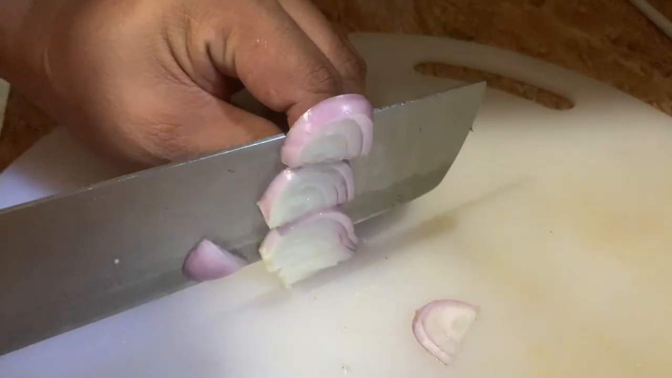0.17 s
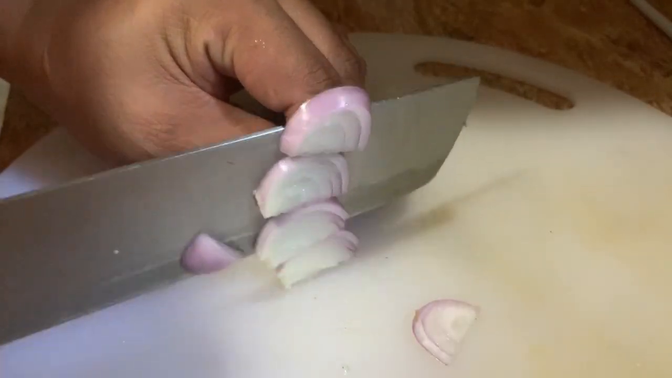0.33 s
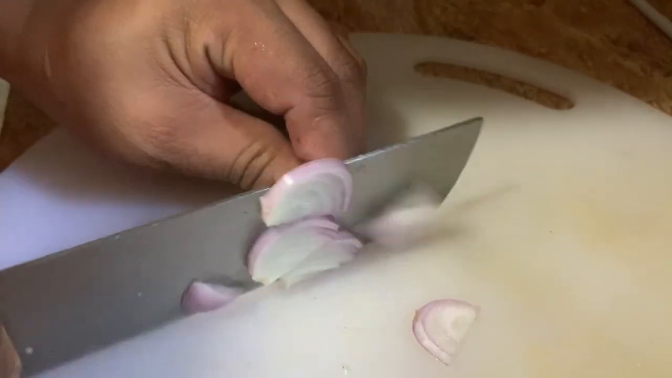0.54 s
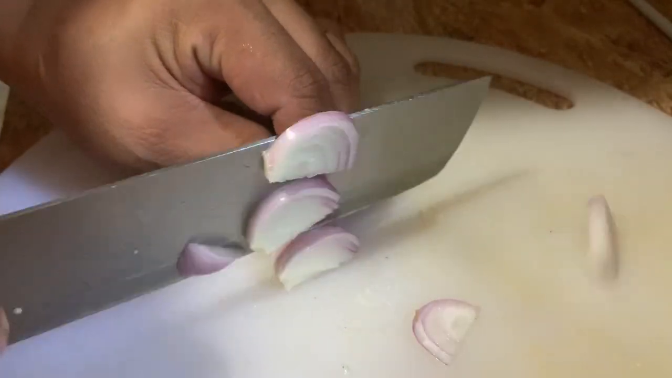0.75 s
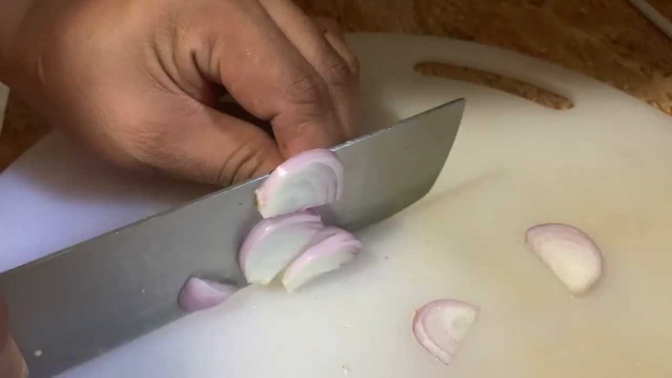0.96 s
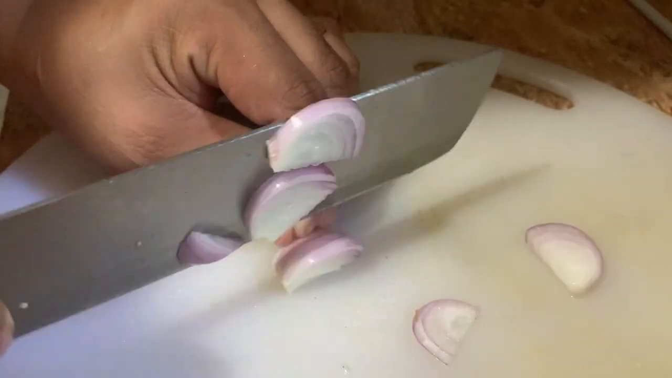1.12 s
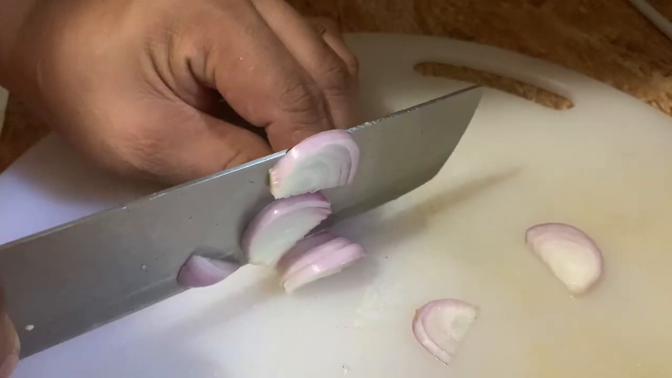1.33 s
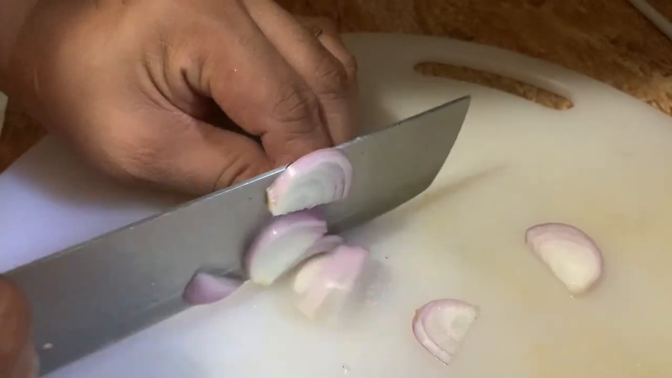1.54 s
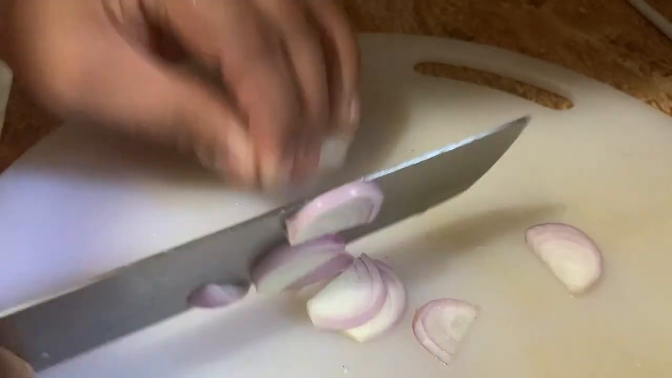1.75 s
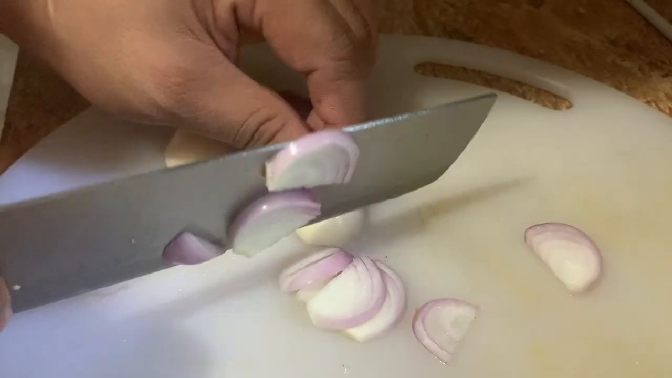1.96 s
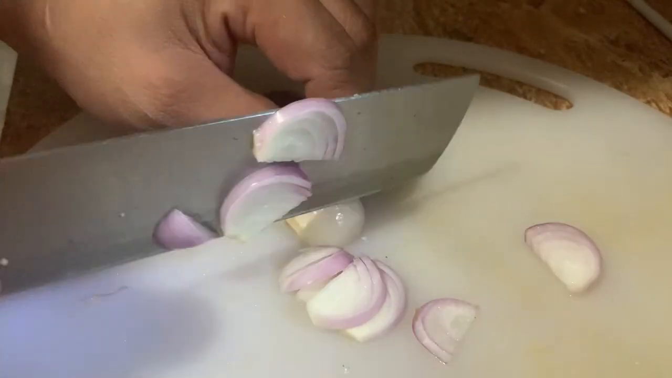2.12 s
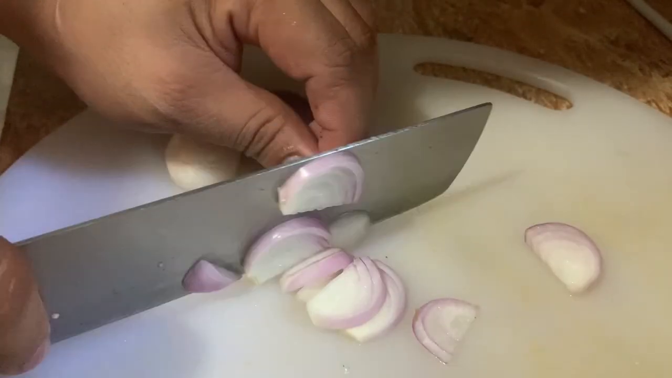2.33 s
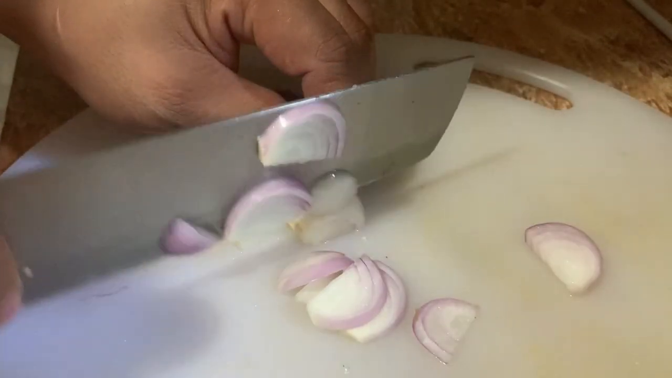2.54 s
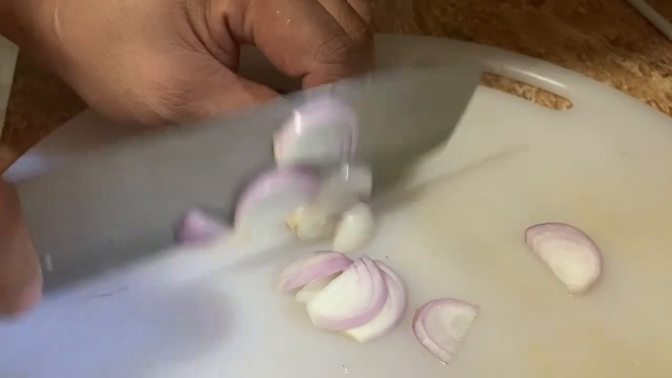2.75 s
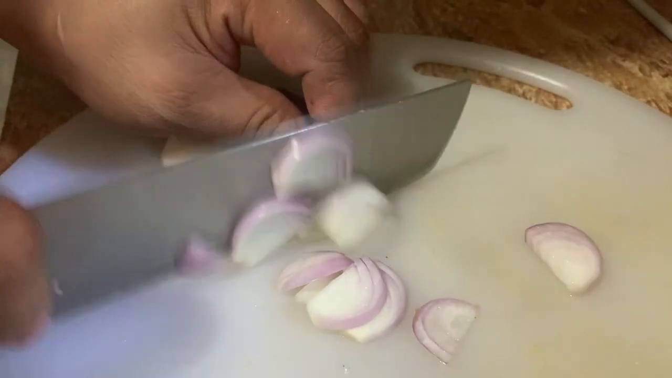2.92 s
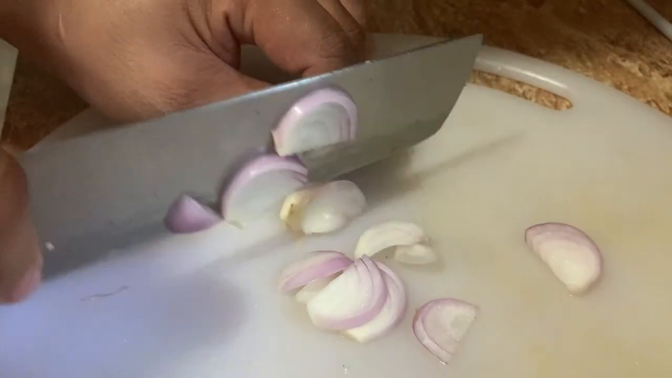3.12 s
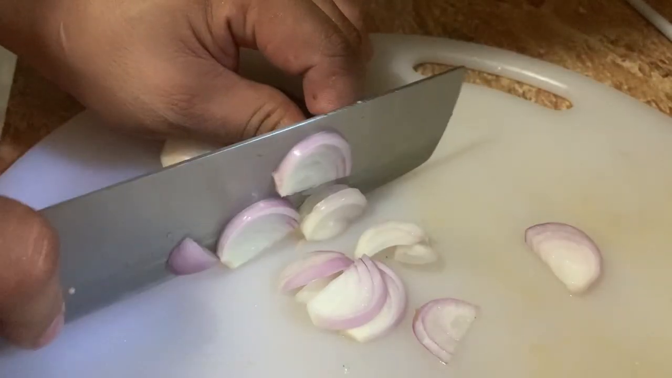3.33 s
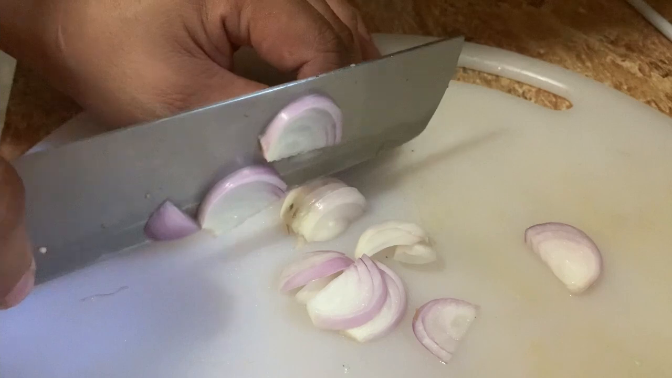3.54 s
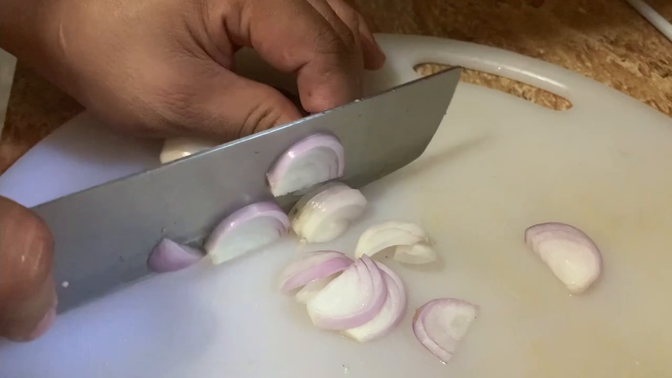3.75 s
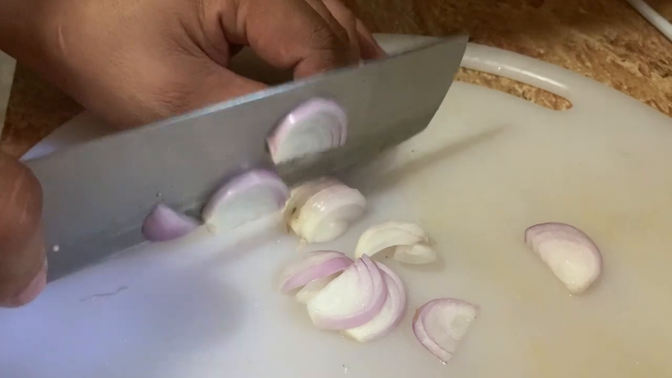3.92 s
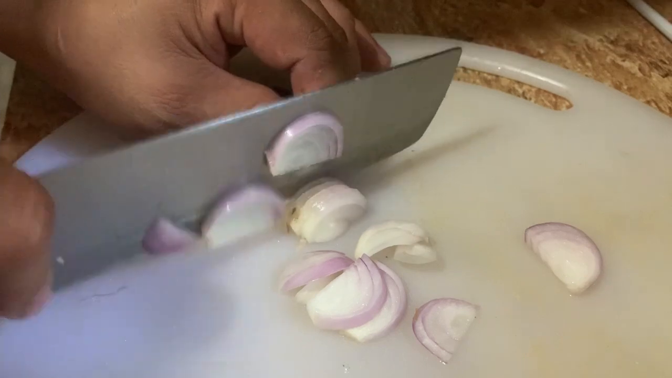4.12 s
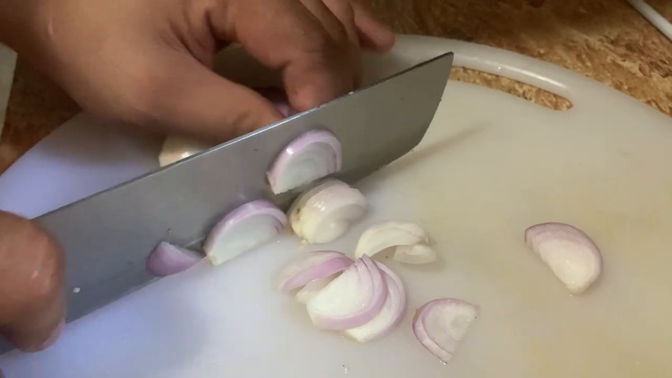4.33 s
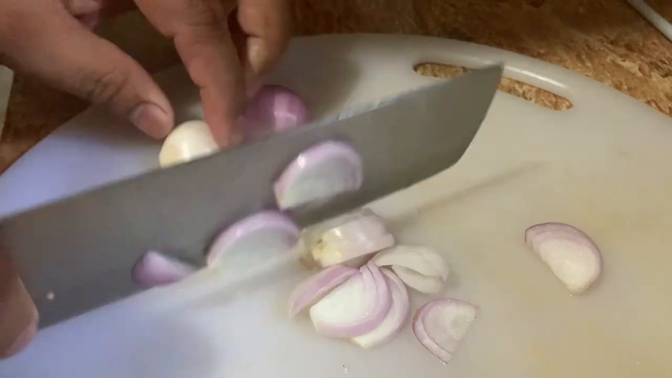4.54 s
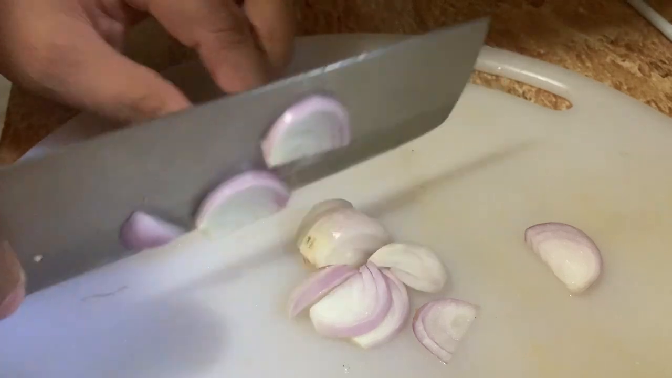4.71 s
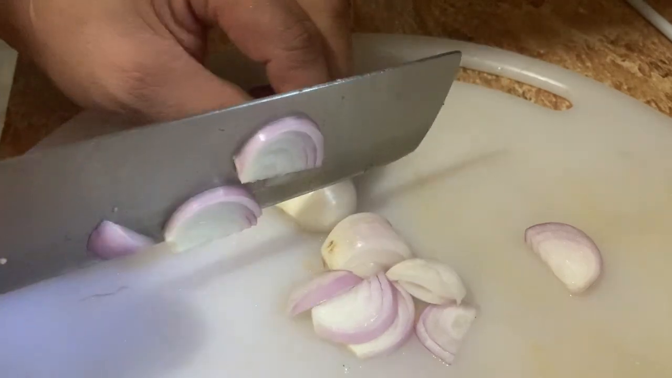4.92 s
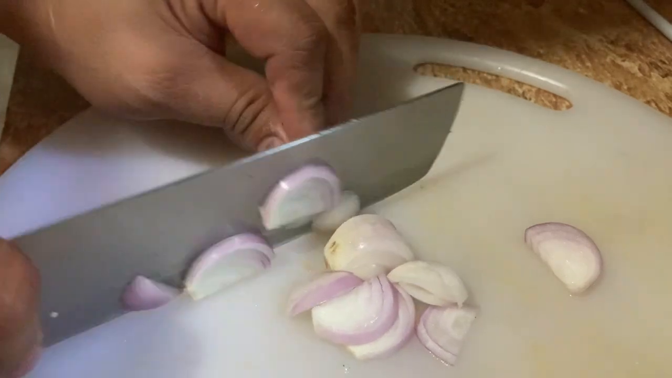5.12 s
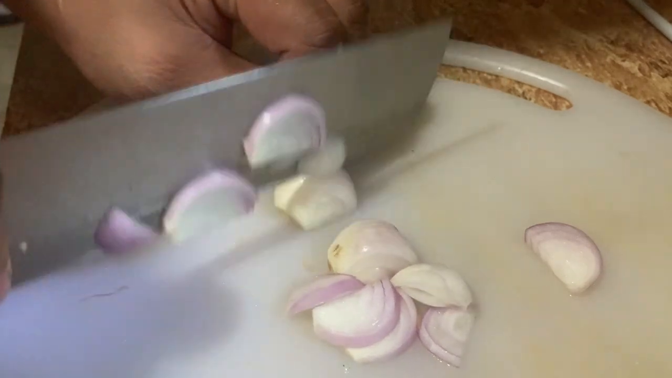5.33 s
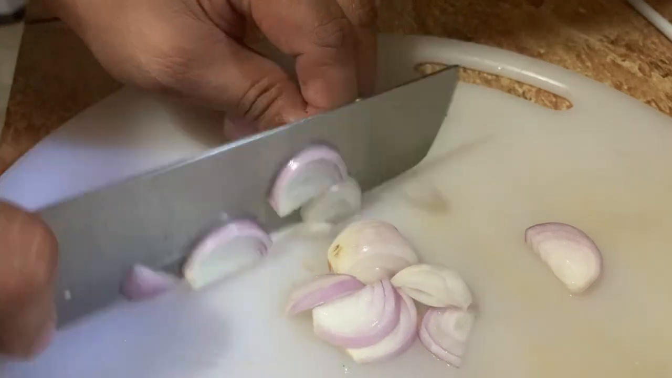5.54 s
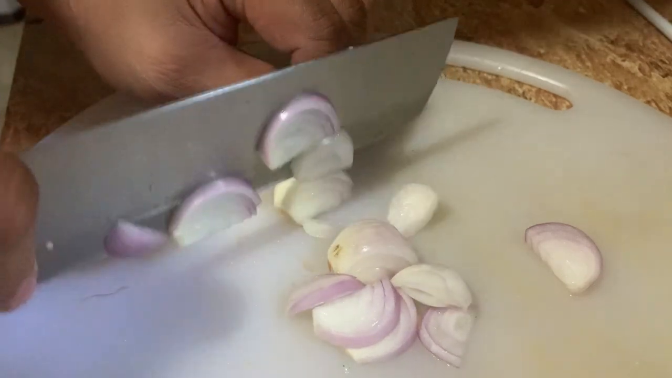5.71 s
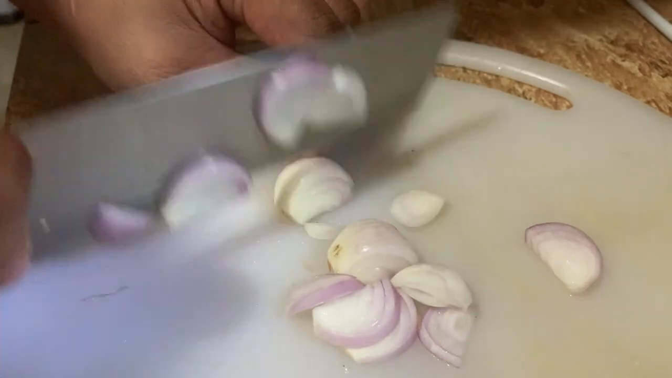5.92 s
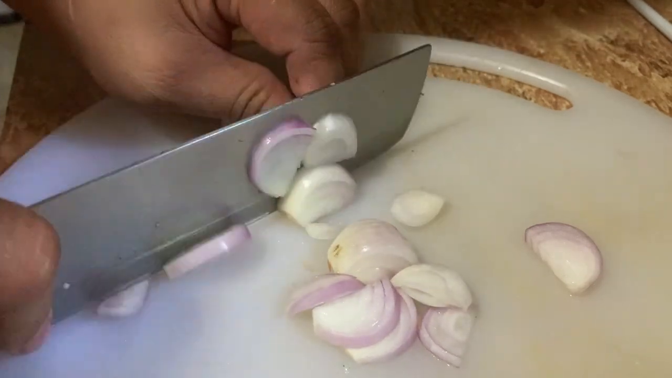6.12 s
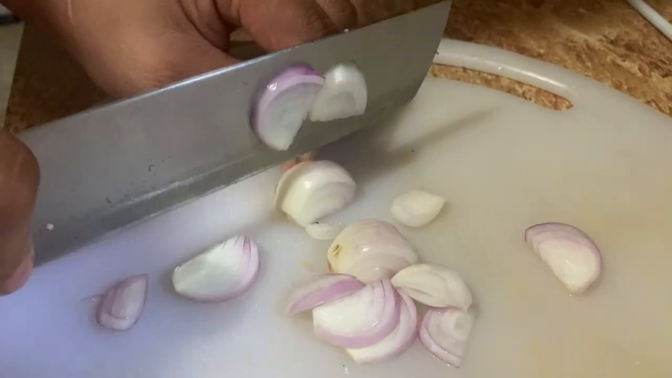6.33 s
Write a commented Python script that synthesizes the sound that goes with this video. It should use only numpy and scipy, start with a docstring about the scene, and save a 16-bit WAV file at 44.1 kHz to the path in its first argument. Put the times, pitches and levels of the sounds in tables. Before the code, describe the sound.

Close stereo phone sound in a small kitchen with a low, steady hum that grows slightly after 2 s. Tiny wet ticks at 0.3 and 0.4 s lead into a large knife slicing small onions on a thick plastic board. Each stroke is a fast-swelling, gritty wet crackle cut off by a hard, hollow knock with a short ring and a brief room tail. Knocks fall at about 0.5, 1.0 and 1.6 s, the third lighter, after thin high squeaks around 1.4 to 1.55. A soft set-down comes at 1.8. A strong, duller knock at 2.3 begins a quicker run at 2.7, 3.0, 3.3, 3.7 and 4.2. A pause brings finger rubs and a soft tap near 4.4, with fainter taps around 4.9. Even chops follow at 5.15, 5.5, 5.8 and 6.15 s, the last weaker and lower. Small snaps and faint slippery blade lifts fill the gaps; a last tick comes at 6.3.

```python
"""Over a low hum come a few wet ticks, then a large kitchen knife slices small onions on a thick plastic board.
Each stroke is a crackle of bursting cells, louder as it goes, ending in a knock that rings the board's modes.
Ticks are short noise bursts and rubs are patchy grit, heard through the two microphone ports of a close phone.
The kitchen answers with a diffuse noise tail; shaped noise and faint drones make the hum."""
import sys
import numpy as np
from scipy import signal
from scipy.fft import rfft, irfft
from scipy.io import wavfile
from scipy.ndimage import uniform_filter1d

SR = 44100
rng = np.random.default_rng(int(sys.argv[2]) if len(sys.argv) > 2 else 0)


def gain_from_db(level_db):
    """Turn a decibel level (scalar or array-like) into a linear amplitude factor."""
    decades = np.asarray(level_db, float) / 20
    return 10 ** decades


def master_out(mix):
    """Clip the mix to full scale and print it as 16-bit PCM to the path in sys.argv[1]."""
    frames = np.transpose(np.atleast_2d(mix))
    ceiling = np.clip(frames, -1, 1)
    pcm = np.round(ceiling * 32767).astype(np.int16)
    wavfile.write(sys.argv[1], SR, pcm)


N = 285327


def curve(table, x):
    """The second column of a table against its first, joined by straight lines."""
    rows = np.array(table, float)
    return np.interp(x, rows[:, 0], rows[:, 1])


def over_hz(table, size):
    """A table against log frequency, at the bins of a transform."""
    rows = np.array(table, float)
    bins_hz = np.fft.rfftfreq(size, 1 / SR)
    return np.interp(np.log(bins_hz + 1), np.log(rows[:, 0] + 1), rows[:, 1])


def unit(x):
    """Scale to an rms of 1."""
    return x / np.sqrt(np.mean(x ** 2))


def unit_energy(x):
    """Scale a two-channel response to a mean energy of 1 per channel."""
    return x / np.sqrt(np.mean(np.sum(x ** 2, axis=1)))


def add(out, sound, start_s):
    """Mix a sound in at a time."""
    i = int(round(start_s * SR))
    out[:, i:i + sound.shape[1]] += sound[:, :N - i]


def walk(rate_hz):
    """Slow chance with a spread of 1: noise smoothed twice over 1 / rate."""
    k = int(SR / rate_hz)
    return unit(uniform_filter1d(uniform_filter1d(rng.standard_normal(N), k), k))


def arch(t, start_s, length_s):
    """Half a sine over a span, zero outside it."""
    return np.sin(np.pi * np.clip((t - start_s) / length_s, 0, 1))


def low_pass(x, hz):
    """Zero-phase low-pass."""
    return signal.sosfiltfilt(signal.butter(2, hz, fs=SR, output="sos"), x)


# Edge striking the board. Each row: strike in seconds, blow in dB, hardness in dB per octave above 700 Hz,
# treble crack in dB, weight of the modes below 560 Hz in dB.
STRIKES = [(.4850, 4.5, 2, -19, -1), (0.9652, 4.5, 2.5, -13, -1.5), (1.5748, -1, -2.5, -15.5, -4.5),
           (2.3167, 5, -5.5, -17, -2), (2.6854, 2, 1, -24, 0), (2.9846, 3, 0.5, -22.5, -1.5),
           (3.3175, 2, -4, -17, -3), (3.6887, 2, 4, -23, 0.5), (4.2042, 1, 3.5, -20, 1.5),
           (5.1450, 3, 0, -13.5, 0), (5.496, 2, 1.5, -19.5, 0), (5.8255, 1.5, 3, -20.5, 0.5),
           (6.1546, -1, 4.5, -29, 3.5)]
# Fingers or onion set down softly on the board. Each row: start in seconds, level in dB.
SET_DOWNS = [(1.832, -35.5), (4.4260, -32.5), (4.922, -46), (4.988, -48)]


def knocks():
    """Every blow lands a little elsewhere, so the modes change their shares."""
    tap_hard_db_per_octave = -10
    out = np.zeros((2, N))
    for strike_s, blow_db, hard_db, _, low_db in STRIKES:
        add(out, gain_from_db(blow_db) * board_ring(hard_db, scatter=.17, low_db=low_db), strike_s)
        add(out, gain_from_db(blow_db) * rattle(hard_db), strike_s)
    for start_s, db in SET_DOWNS:
        add(out, gain_from_db(db) * board_ring(tap_hard_db_per_octave, scatter=.17), start_s)
    return signal.sosfilt(signal.butter(2, 90, "high", fs=SR, output="sos"), out)


# Modes of the board. Each row: nominal Hz, t60 in seconds (before the cap of 75 cycles),
# relative swing at the left port, at the right port; the sign is the side of the nodal line.
BOARD_MODES = [(135.3, 0.029, -0.21, -0.29), (201.3, 0.048, 0.12, 0.09), (283.5, 0.053, 0.098, 0.012),
               (315.7, 0.036, -0.62, -0.56), (338.3, 0.12, -0.033, -0.069), (425, 0.03, 0.23, -0.32),
               (455.2, 0.244, 0.042, 0.049), (470, 0.04, -0.13, 0.4), (535.6, 0.029, -0.17, -0.2),
               (669, 0.059, -0.16, 0.051), (702.5, 0.25, 0.041, -0.097), (773, 0.013, -1.01, -0.58),
               (854, 0.049, -0.086, 0.074), (946, 0.034, -0.076, -0.14), (1065, 0.094, -0.0056, 0.066),
               (1152, 0.097, 0.033, 0.0086), (1273, 0.012, 0.82, -0.29), (1291.4, 0.026, -0.25, 0.34),
               (1444, 0.124, -0.053, 0.05), (1527, 0.077, -0.0067, -0.12), (1617, 0.013, -0.44, 0.078),
               (1757, 0.009, 0.16, 0.38), (1996, 0.02, -0.12, -0.082), (2168, 0.022, 0.12, -0.089),
               (2194, 0.036, -0.2, 0.029), (2340, 0.016, -0.12, -0.16), (2610, 0.014, -0.19, 0.092),
               (2940, 0.085, 0.011, -0.013), (2962, 0.023, -0.016, 0.077), (3545, 0.0071, -0.117, -0.078)]


def board_ring(hard_db=0., scatter=0., low_db=0.):
    """Modes after one push; build-up time is a fixed part of a cycle, so the highs come first."""
    rise_cycles, right_lag_s = .483, .000186
    hz, t60_s, left, right = np.transpose(BOARD_MODES)
    share_chance, pitch_chance = rng.standard_normal((2, len(hz)))
    octaves = np.maximum(np.log2(hz / 700), 0)
    # the higher the mode, the more it cares where the edge lands
    landing = 1 + scatter * hz / 1000 * share_chance
    share = gain_from_db(hard_db * octaves + low_db * (hz < 560)) * landing
    hz = hz * (1 + 0.052 * scatter * pitch_chance)
    # plastic loses a share of the energy on every cycle
    t60_s = np.minimum(t60_s, 75 / hz)
    out = []
    for swing, lag_s in ((left, 0), (right, right_lag_s)):
        t = np.maximum(np.arange(int(.3 * SR))[:, None] / SR - lag_s, 0)
        decay = np.exp(-np.log(1000) * t / t60_s)
        rise = (1 - np.exp(-t * hz / rise_cycles)) ** 2
        modes = decay * np.sin(2 * np.pi * hz * t) * rise
        out.append(modes @ (swing * share))
    return np.array(out)


def rattle(hard_db):
    """Blade and loose slices shake for a moment after a blow: band noise, louder for hard blows."""
    rise_ms, fade_ms = 0.78, 8.0
    t_ms = np.arange(int(.12 * SR)) * 1000 / SR
    envelope = (1 - np.exp(-t_ms / rise_ms)) * np.exp(-t_ms / fade_ms)
    noise = rng.standard_normal((2, len(t_ms))) * envelope
    band = signal.butter(2, [900, 4500], "band", fs=SR, output="sos")
    return gain_from_db(-24.0 + 2.16 * hard_db) * signal.sosfilt(band, noise)


# One row a stroke, each ending at its strike. Each row: blade enters in seconds, crackle there in dB,
# full bite in seconds, crackle there in dB, coarse tearing below 7 kHz in dB.
STROKES = [(.425, -65, 0.47, -26.5, -1.5), (.875, -58.5, 0.96, -29.5, -1.5), (1.475, -54, 1.555, -32.5, -7),
           (2.237, -55.5, 2.287, -33.5, -1), (2.605, -46, 2.643, -33.5, 2.5),
           (2.915, -49.5, 2.964, -28.5, 1.5), (3.261, -38.5, 3.29, -28.5, 0),
           (3.615, -55, 3.643, -30, -2.5), (4.118, -63, 4.159, -29.5, -4.3),
           (5.072, -66, 5.097, -35.5, -4.5), (5.42, -52, 5.448, -30.5, -5), (5.75, -51, 5.782, -28, -5.5),
           (6.085, -50.5, 6.137, -28.5, -10)]


def strokes():
    """Crackle levels in the air and into the board, and the coarse tearing in dB, over time."""
    bite_swell_db_per_s = 123  # still grows after full bite
    carried_last_db, carried_db_per_s, carried_least_db = -0.5, 269, -10
    t = np.arange(N) / SR
    air, push, coarse_db = np.zeros((1, N)), np.zeros((1, N)), np.zeros(N)
    for (enter_s, enter_db, full_s, full_db, tear_db), (strike_s, *_) in zip(STROKES, STRIKES):
        # the crackle stops dead when the blade reaches the board
        on = (t > enter_s) & (t < strike_s)
        db = np.interp(t, [enter_s, full_s], [enter_db, full_db])
        db += bite_swell_db_per_s * np.clip(t - full_s, 0, strike_s - full_s)
        # the nearer the edge is to the board, the more of the crackle the board carries
        share_db = carried_last_db - carried_db_per_s * (strike_s - t)
        share_db = np.clip(share_db, carried_least_db, carried_last_db)
        air += on * gain_from_db(db)
        push += on * gain_from_db(db + share_db)
        coarse_db += on * tear_db
    # the blade moves in jerks from layer to layer
    return air * gain_from_db(2.0 * walk(100)), push * gain_from_db(5.9 * walk(100)), coarse_db


# Layers snapping, slices coming unstuck, the edge touching down. Each row: start in seconds,
# level in air in dB, level into the board in dB, fade in ms (in air).
SNAPS = [(0.27, -40, -60, 3.2), (0.38, -28.5, -30, 3.1), (0.4574, -28.5, -31.5, 3), (.6213, -47, -62, 4.6),
         (0.7102, -36.5, -52, 1.5), (0.78, -35, -53, 2.5), (0.909, -31, -38, 3.1), (0.9453, -19, -25, 3.3),
         (1.3687, -41.5, -49, 6.1), (1.5592, -27, -33, 11), (1.5921, -18, -43, 3.3),
         (1.7787, -36, -51, 2.3), (1.83, -47, -44, 3.1), (2.1088, -54, -43, 2.1), (2.2737, -24, -40, 3),
         (2.433, -46, -62, 3), (2.592, -20, -21, 3.9), (2.6668, -17, -18, 1.8), (2.77, -41, -48, 2.7),
         (2.817, -37, -54, 4.6), (2.93, -38, -24.5, 4.14), (2.957, -26.5, -18, 4.6),
         (3.1645, -26, -34, 2.9), (3.25, -20.5, -25, 4.3), (3.279, -20.5, -39.5, 4),
         (3.4431, -51, -61, 2.7), (3.47, -46, -51, 5.1), (3.5229, -26, -35, 3.17), (3.562, -36.5, -40, 4),
         (3.681, -15, -40, 2), (3.8775, -51, -41, 5.9), (3.9882, -38.5, -43, 4), (4.1573, -36, -27, 3),
         (4.191, -28.5, -38, 2.3), (4.425, -42, -33.5, 4.1), (4.994, -43, -50, 2.9), (5.0933, -33, -48, 2),
         (5.2488, -43, -45, 5.3), (5.4033, -20, -25, 2.7), (5.4589, -20, -31, 3.3),
         (5.6048, -45.5, -40, 2.4), (5.7364, -26.5, -27.5, 5.5), (5.763, -23.5, -31.5, 3.4),
         (5.9847, -31, -34, 3.2), (6.0582, -22, -28.5, 8.5), (6.126, -20, -38, 6.9), (6.333, -32, -55, 3.3)]


def ticks(air, push, lift_after_s, lift_s):
    """Adds short cracks to the air and board levels: snaps, unsticking slices, the crack of each knock."""
    for start_s, air_db, board_db, fade_ms in SNAPS:
        add(air, gain_from_db(air_db) * burst(fade_ms), start_s)
        add(push, gain_from_db(board_db) * burst(0.87 * fade_ms), start_s)
    for (strike_s, _, _, crack_db, _), (when, size) in zip(STRIKES, rng.random((len(STRIKES), 2))):
        # a faint tick at a chance moment while the blade lifts
        unstick_s = strike_s + lift_after_s + when * lift_s
        add(air, gain_from_db(-58.5 + 6.0 * size) * burst(fade_ms=2.5), unstick_s)
        add(air, gain_from_db(crack_db) * burst(fade_ms=4.25), strike_s - .001)


def burst(fade_ms, rise_ms=1.52):
    """Envelope of a short crack."""
    t_ms = np.arange(int(.06 * SR)) * 1000 / SR
    return ((1 - np.exp(-t_ms / rise_ms)) * np.exp(-t_ms / max(fade_ms, .3)))[None]


def onion():
    """Bursting cells and sliding slices: part goes through the air, part rings the board."""
    lift_after_s, lift_s = 0.068, 0.14
    air, push, coarse_db = strokes()
    ticks(air, push, lift_after_s, lift_s)
    ring = unit_energy(board_ring(hard_db=4.0))
    board_grit = grit(900, spread_db=4.7, hiss=0.67)
    carried = signal.fftconvolve(push * board_grit, ring, axes=1)[:, :N]
    # it bursts all along the edge, so a part differs between the ports
    shared = patchy(grit(6000, spread_db=5.7, hiss=0.53), 1.8, 110)
    grain = shared + 0.5 * rng.standard_normal((2, N))
    coarse = low_pass(grain, 7000)
    crackle = air * (grain - coarse + gain_from_db(coarse_db) * coarse)
    return through_air(crackle + rubs(lift_after_s, lift_s) + squeak()) + carried


def grit(clicks_per_s, spread_db, hiss):
    """Cells bursting: dense clicks of uneven size over a wet hiss."""
    when, sign, chance = rng.random((3, N))
    size = np.minimum(-np.log(1 - chance), 3)
    clicks = (when < clicks_per_s / SR) * np.sign(sign - .5) * gain_from_db(spread_db * size)
    return unit(unit(clicks) + hiss * rng.standard_normal(N))


def patchy(x, patchy_db, rate_hz):
    """Each tearing layer has its own pitch: bands half an octave apart flare separately."""
    spectrum = rfft(x)
    octave = np.log2(np.fft.rfftfreq(N, 1 / SR) + 1)
    total = 0
    for center in np.arange(9, 14.6, .5):
        band = np.cos(np.pi * np.clip(octave - center, -.5, .5)) ** 2
        total = total + irfft(spectrum * band, N) * gain_from_db(patchy_db * walk(rate_hz))
    return unit(total)


# Fingers and slices sliding on the wet board. Each row: start in seconds, length in seconds, level in dB.
SLIDES = [(0.392, 0.048, -52), (0.806, 0.15, -59), (1.097, 0.06, -58), (1.404, 0.064, -52.5),
          (1.738, 0.066, -59), (1.952, 0.043, -56.5), (3.128, 0.055, -56), (3.44, 0.067, -77),
          (3.567, 0.054, -54), (4.406, 0.058, -50.5), (4.459, 0.08, -54), (4.594, 0.044, -59),
          (4.67, 0.14, -63), (4.784, 0.11, -57.5), (5.394, 0.034, -44), (6.066, 0.042, -43)]


def rubs(lift_after_s, lift_s):
    """Slides catch and slip as patchy grit; the wet blade slides up after each knock, over a faint hiss."""
    hiss_db, lift_db = -78.5, -69
    dull_hz, top_db = 7500, -3  # skin and slices slide duller than the blade
    t = np.arange(N) / SR

    def slide(start_s, length_s, db):
        """Rises a little faster than it dies away."""
        return gain_from_db(db) * np.sin(np.pi * np.clip((t - start_s) / length_s, 0, 1) ** 0.88)

    lifts = gain_from_db(hiss_db) + sum(slide(strike[0] + lift_after_s, lift_s, lift_db) for strike in STRIKES)
    grain = gain_from_db(3.6 * walk(110)) * patchy(grit(1200, spread_db=4.0, hiss=0.61), 4.6, 35)
    dull = low_pass(grain, dull_hz)
    slides = sum(slide(*row) for row in SLIDES)
    return lifts * grain + slides * (dull + gain_from_db(top_db) * (grain - dull))


# Wet blade squeaking along a layer. Each row: start in seconds, length in seconds, mean Hz, mean level in dB.
SQUEAKS = [(1.415, 0.036, 4430, -59.5), (1.477, 0.022, 4400, -55), (1.502, 0.035, 4470, -44),
           (1.535, 0.018, 4600, -42)]


def squeak():
    """Short thin tones that waver in pitch and flutter in level."""
    t = np.arange(N) / SR
    waver_hz = 70.0 * walk(510)
    waver = 2 * np.pi * np.cumsum(waver_hz) / SR
    flutter_db = 4.1 * walk(200)
    out = np.zeros(N)
    for start_s, length_s, hz, db in SQUEAKS:
        tone = np.sin(2 * np.pi * hz * t + waver)
        out += gain_from_db(db + flutter_db) * arch(t, start_s, length_s) ** 2 * tone
    return out


# Colour of small wet sounds. Each row: Hz, relative level in dB.
WET_COLOUR = [(300, -27.5), (1000, -12.5), (2400, -3.5), (3500, -3), (4400, -1), (5300, -6.5), (6500, -5.5),
              (8300, -6), (9500, -1.5), (11000, 0), (13000, -3), (15300, -1.5), (16500, -0.5)]
# Level of the left port over the right. Each row: Hz, difference in dB.
PORT_TILT = [(1300, 3.5), (2400, 8.5), (4400, -4.5), (8000, 0.5), (15000, 0)]
# Phase of the right port. Each row: Hz, turn in radians.
PORT_PHASE = [(0, 0), (2700, -3.1), (5000, -4.6), (6800, -5.7), (8700, -3.14), (13600, 3.14), (16000, 6.3)]


def through_air(x):
    """Colours small wet sounds; the phone's body sets level and phase between the ports."""
    colour = gain_from_db(over_hz(WET_COLOUR, N))
    spectrum = rfft(x) * unit(colour)
    tilt = gain_from_db(over_hz(PORT_TILT, N) / 2)
    turn = np.exp(1j * curve(PORT_PHASE, np.fft.rfftfreq(N, 1 / SR)))
    return irfft(spectrum * np.array([tilt, turn / tilt]), N)


# Echo bands. Each row: centre in Hz, t60 in seconds, level in dB (before the sqrt(Hz / SR) weight),
# likeness of the ports from 0 to 1.
ECHO_BANDS = [(190, 0.27, -22, 0.84), (420, 0.26, -10.5, 0.57), (1290, 0.24, -9.5, 0.095),
              (2940, 0.25, -8, 0.29), (5800, 0.18, -10, 0.84), (13000, 0.17, -11.5, .9)]


def kitchen(x):
    """Walls and worktop answer with a short diffuse tail, shorter in the treble."""
    gap_ms = 0.89
    t = np.arange(int(.5 * SR)) / SR
    rise = (1 - np.exp(-t * 1000 / gap_ms)) ** 2
    tail = 0
    for hz, t60_s, db, alike in ECHO_BANDS:
        band = signal.butter(2, [hz / 1.55, min(hz * 1.55, .45 * SR)], "band", fs=SR, output="sos")
        shared, left, right = rng.standard_normal((3, len(t)))
        alike = np.clip(alike, 0, 1)
        noise = np.sqrt(alike) * shared + np.sqrt(1 - alike) * np.array([left, right])
        decay = np.exp(-np.log(1000) * t / t60_s)
        response = signal.sosfilt(band, noise) * decay * rise
        tail = tail + gain_from_db(db) * unit_energy(response) * np.sqrt(hz / SR)
    return signal.fftconvolve(x, tail, axes=1)[:, :N]


# Spectrum of the hum. Each row: Hz, relative level in dB.
HUM_COLOUR = [(15, -43.5), (25, -20.5), (49, -5), (76, -10.5), (118, -2.5), (286, -20), (340, -11.5),
              (385, -21.5), (469, -12.5), (517, -22), (1190, -23), (2560, -33.5), (3360, -41), (5110, -45),
              (9000, -62), (11700, -83), (19800, -120)]
# Likeness of the hum at the two ports. Each row: Hz, correlation (clipped to -0.95 .. 0.99).
HUM_LIKENESS = [(60, 0.99), (130, 0.88), (290, 0.72), (640, -0.12), (1410, -0.23), (3100, 0.071),
                (6820, -0.04), (15000, 0.09)]
# Mean level of the hum. Each row: time in seconds, level in dB.
HUM_LEVEL = [(0.0, -53), (0.5, -50.5), (1.91, -49), (2.5, -44), (5.4, -45.5), (6.25, -45), (6.47, -51)]
# Faint low tones that come and go. Each row: start in seconds, length in seconds, Hz, mean level in dB.
HUM_TONES = [(0.726, 0.15, 483, -57.5), (1.915, 0.26, 257, -53), (2.135, .15, 470, -54),
             (4.5, 0.13, 340, -58), (4.6, 0.14, 476, -53), (4.875, 0.18, 190, -47.5)]


def hum():
    """Appliances and far traffic in the room's resonances; the bass is alike at both ports."""
    t = np.arange(N) / SR
    alike = np.clip(over_hz(HUM_LIKENESS, N), -.95, .99)
    colour = gain_from_db(over_hz(HUM_COLOUR, N))
    mid = irfft(rfft(rng.standard_normal(N)) * colour * np.sqrt(1 + alike), N)
    side = irfft(rfft(rng.standard_normal(N)) * colour * np.sqrt(1 - alike), N)
    level = gain_from_db(curve(HUM_LEVEL, t) + .8 * walk(8))
    out = unit(np.array([mid + side, mid - side])) * level
    for start_s, length_s, hz, db in HUM_TONES:
        tone = np.sin(2 * np.pi * hz * t)
        out += gain_from_db(db + 5.5 * walk(30)) * arch(t, start_s, length_s) * tone
    return out


def scene():
    """Knife, onion and board in the kitchen."""
    near = knocks() + onion()
    return near + kitchen(near) + hum()


def band_limit(x):
    """A steep low-pass at the top of the band."""
    return signal.sosfilt(signal.butter(12, 17000, fs=SR, output="sos"), x)


def record(dry):
    """The phone rounds the loudest peaks and cuts the deepest bass and the top."""
    bass_hz, top_hz, peak_knee = 35, 15800, 0.86
    dry = signal.sosfilt(signal.butter(2, bass_hz, "high", fs=SR, output="sos"), dry)
    soft = dry / (1 + np.abs(dry / peak_knee) ** 4) ** 0.28
    finished = signal.sosfilt(signal.ellip(10, .2, 60, top_hz, fs=SR, output="sos"), soft)
    return band_limit(finished)


dry = scene()
out = record(dry)
master_out(out)
```